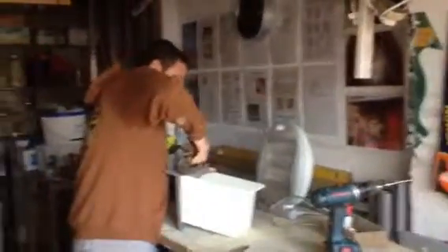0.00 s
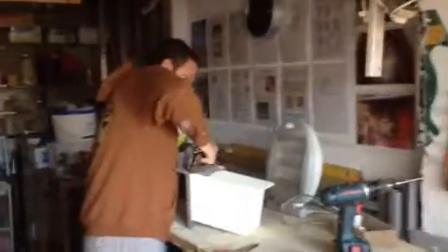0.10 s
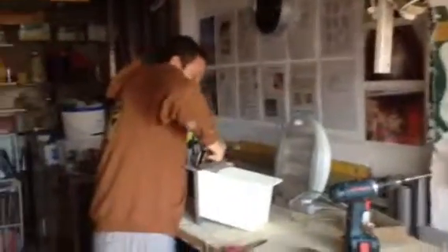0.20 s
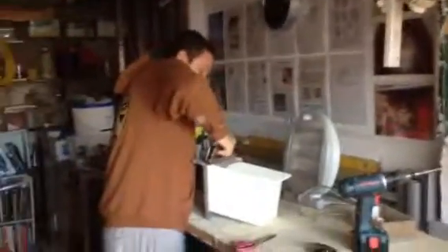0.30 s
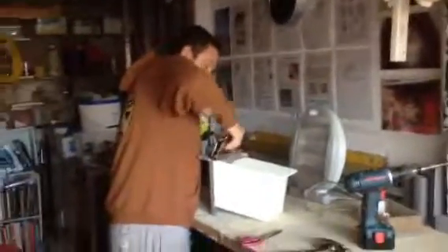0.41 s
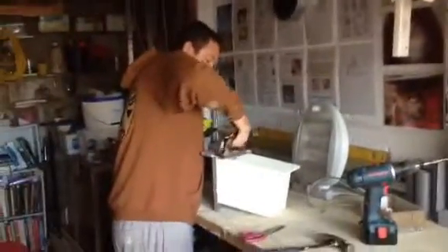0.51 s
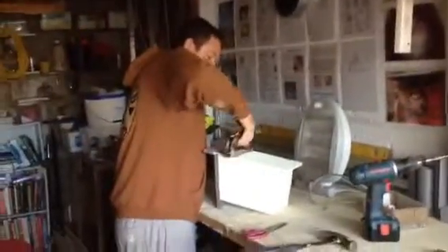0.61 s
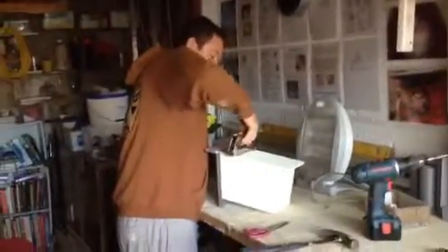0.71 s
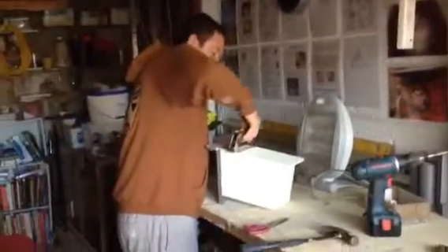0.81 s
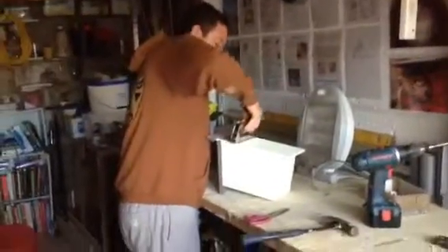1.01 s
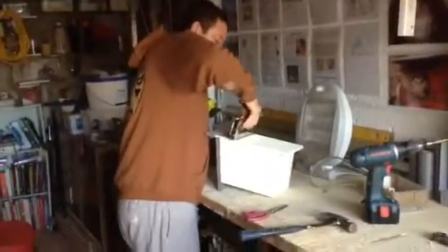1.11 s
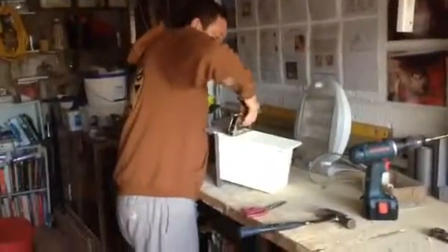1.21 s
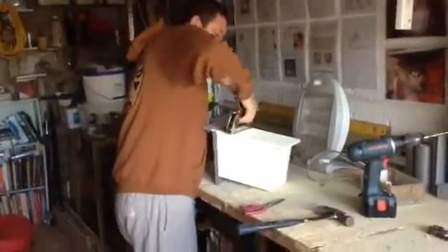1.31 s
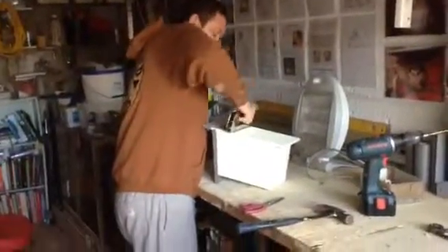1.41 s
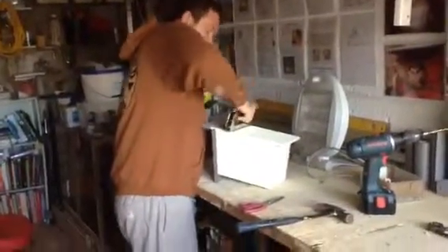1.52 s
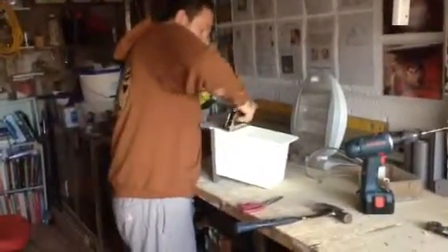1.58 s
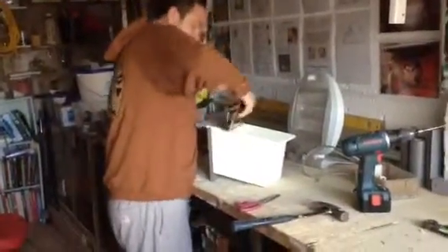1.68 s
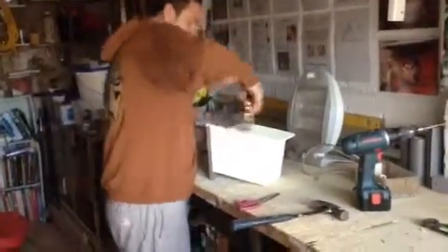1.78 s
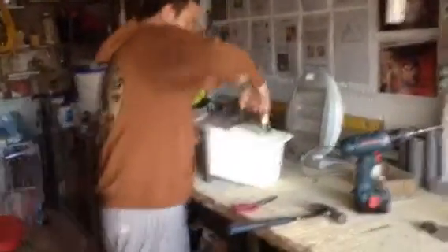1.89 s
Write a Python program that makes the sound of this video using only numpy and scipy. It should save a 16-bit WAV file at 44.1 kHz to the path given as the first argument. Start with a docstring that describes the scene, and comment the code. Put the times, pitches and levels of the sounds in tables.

```python
"""A small, cluttered workshop: a hand staple gun fires twice into a wooden box.
Each time the lever is squeezed and catches, the striker slams home and rings gun and box, the spring
sings on, and the lever clicks back. Between the shots the gun is set down on the box again.
Hits are coloured noise bursts with a short room tail; the ringing is decaying sine modes.
Soft hand rubs and quiet room tone sit underneath, and a faint hiss lingers after the first shot."""
import sys
import numpy as np
from scipy import signal
from scipy.fft import rfft, irfft
from scipy.io import wavfile
from scipy.ndimage import uniform_filter1d

SR = 44100
rng = np.random.default_rng(int(sys.argv[2]) if len(sys.argv) > 2 else 0)


def wrap_up_sound(samples):
    """Save the sound to the file named by the first command line argument, as 16-bit audio."""
    columns = np.atleast_2d(samples).T
    # keep every value between -1 and 1, then stretch to whole-number steps
    tamed = np.clip(columns, -1, 1)
    steps = np.round(tamed * 32767).astype(np.int16)
    wavfile.write(sys.argv[1], SR, steps)


N = 83790
T = np.arange(N) / SR
HZ = np.maximum(np.arange(N // 2 + 1) * SR / N, 1)

# the second row is a faint hiss lingering after the first shot; the others are hand and lever rubs
# (start [s], end [s], end level [dB], rise from start to end [dB])
RUB_AND_HISS_CUES = [(.02, .217, -60.5, 16.5), (.35, 0.426, -80, -19), (.54, 0.612, -59, 26),
                     (1.29, 1.463, -51, 29), (1.69, 1.749, -66.5, -2)]
# the lever catches under load (time [s], level [dB])
CATCH_CUES = [(0.1636, -52.5), (.1682, -38.5), (.176, -47), (.191, -47), (1.395, -57.5), (1.4304, -40.5),
              (1.4356, -37)]
# shots (time [s], slam level [dB], box boom [dB], steel rattle [dB], spring ring [dB])
SHOT_CUES = [(0.2202, -12.5, -26, -15, -63), (1.4807, -13.5, -14, -19, -52.5)]
# the lever springs back (time [s], level [dB])
CLICK_CUES = [(0.45, -55), (0.455, -43), (1.710, -66), (1.734, -51.5), (1.7408, -45), (1.8058, -47),
              (1.8283, -46)]
# the gun knocks on the box (time [s], level [dB], lever ring [dB])
KNOCK_CUES = [(0.61, -36.5, -67), (.906, -61, -89), (0.921, -66.5, -88.5)]

# modes of the gun pressed on the box (frequency [Hz], t60 [s], first shot [dB], second shot [dB])
BODY_MODES = [(325, 0.078, -31.5, -49.5), (536, 0.16, -46, -36), (672, 0.21, -44.5, -28),
              (866, 0.13, -16.5, -30), (1802, .17, -33, -33.5), (1855, .15, -22.5, -22),
              (1939, 0.25, -27.5, -30), (2196, 0.23, -31, -33), (3132, 0.18, -26, -37.5),
              (3280, .15, -32, -28.5), (3373, .14, -29, -30), (3704, 0.13, -21.5, -37.5),
              (4650, 0.17, -24.5, -41.5), (6904, .1, -37, -34.5), (7860, .09, -35, -33)]
# the spring's long ring (frequency [Hz], t60 [s], relative level [dB])
SPRING_MODES = [(1610, .7, -9), (1938, .7, -4.5), (2370, 1.1, -9.5), (2490, 1.1, -5.5), (3176, .5, -3.5),
                (3283, .6, -5.5), (3200, .8, 2.5), (3830, 0.67, -2.5), (3800, .7, -8), (4597, 0.64, 1)]

# noise colour of each layer (frequency [Hz], relative level [dB])
ROOM_TONE_EQ = [(25, -34.5), (60, -21), (100, -4.5), (140, 1), (250, -3), (450, -6.5), (1000, -9.5),
                (2000, -18), (4000, -22), (8000, -24.5), (15000, -30)]  # low, soft air
RUB_AND_HISS_EQ = [(80, -10), (200, -2.5), (900, -1), (1300, -7), (1950, -1), (2600, -10), (3900, -3),
                   (6000, -14), (8200, -10.5), (11000, -20.5), (15000, -27.5)]  # dry rustle
CATCH_EQ = [(50, -24.5), (130, -4), (220, 4), (400, -5), (870, 1.5), (1290, -9.5), (1700, 1.5), (2400, -10),
            (3600, -2), (6000, -14.5), (8000, -10.5), (15000, -23.5)]  # dull clunk
SLAM_EQ = [(60, -28), (140, -9.5), (250, -8.5), (330, -3), (460, -12), (850, -1), (1150, -3), (1600, -0.5),
           (2300, -3.5), (4600, 1), (6300, -8.5), (7700, 0), (9000, -9), (11200, -9.5), (13000, -16),
           (15000, -10.5)]  # full-range smack
CRACK_EQ = [(500, -23), (2500, -11), (4000, 2), (5200, 0.5), (6300, -6.5), (7600, -0.5), (9500, -7.5),
            (11500, -0.5), (15000, -8.5)]  # sharp top
BOOM_EQ = [(100, -26.5), (280, -28.5), (440, -18.5), (540, -2.5), (590, -9.5), (680, -0.5), (770, -9.5),
           (870, 3.5), (990, -1), (1130, -17.5), (1500, -3.5), (2000, -5.5), (2800, -26), (8000, -45)]  # hollow wood
STEEL_EQ = [(300, -23.5), (1200, -25.5), (1850, -1.5), (2200, -5.5), (2500, -1.5), (2850, -13), (3150, -2),
            (3700, 2), (4100, -13), (5200, -11.5), (9000, -26.5), (15000, -36.5)]  # metallic bite
CLICK_EQ = [(200, -33), (500, -43), (1000, -9), (1700, -4), (3200, -9), (3850, 3.5), (4500, -0.5),
            (5600, -8), (8000, -1), (10000, -12.5), (15000, -13)]  # thin and bright
KNOCK_EQ = [(40, -22), (100, -9.5), (190, 9), (320, -1), (430, -5), (650, -4), (860, -5), (1400, -17.5),
            (1700, -8), (2000, -14), (4300, -21.5), (8000, -37), (15000, -46)]  # low thud
TAP_EQ = [(100, -18), (600, -12), (920, 5), (1250, -16.5), (1750, -8), (2500, -37), (3700, -23.5),
          (5500, -36.5), (15000, -38.5)]  # woody mids

# the workshop's decay (frequency [Hz], t60 [s])
ROOM_DECAY = [(50, 0.3), (130, 0.243), (300, 0.1259), (800, 0.2126), (2000, 0.17), (5000, 0.1646),
              (9000, 0.15), (15000, 0.13)]
# strength of its reverb (frequency [Hz], gain [dB])
ROOM_EQ = [(60, -0.5), (130, 12.5), (260, 2.5), (500, 5), (1000, -0.5), (4000, 0), (12000, 1)]
# faint lingering ring of the clutter (frequency [Hz], relative level [dB])
CLUTTER_EQ = [(60, -43.5), (150, -36), (400, -35), (900, -41.5), (2000, -29.5), (4500, -38.5),
              (8000, -47.5), (15000, -56.5)]

LEVER_HZ, LEVER_T60_S = 3790, .7


def undb(db):
    """Decibels to gain."""
    return 10 ** (np.asarray(db) / 20)


def curve(points, hz):
    """Read a table on a log-frequency axis."""
    f, v = np.array(points).T
    return np.interp(np.log(hz), np.log(f), v)


def fade(t60, hold=0):
    """Hold, then die away by 60 dB in t60 seconds."""
    return np.exp(-np.log(1000) * np.maximum(T - hold, 0) / t60)


def attack(rise):
    """Fade in with a time constant of rise seconds."""
    return 1 - np.exp(-T / rise)


def at(start, x):
    """Delay a sound to its cue."""
    k = int(start * SR)
    return np.pad(x[:N - k], (k, 0))


def noise(colour):
    """Noise of a given colour, rms 1."""
    x = irfft(undb(curve(colour, HZ)) * np.exp(2j * np.pi * rng.random(len(HZ))), N)
    return x / x.std()


def ring(hz, t60):
    """One decaying mode."""
    return np.sin(2 * np.pi * (hz * T + rng.random())) * fade(t60)


def room_tail(colour, size=22050, clutter_t60=.95):
    """The workshop answers a hit: each octave dies at its own pace, the lows bloom late and stay."""
    spectrum = rfft(noise(colour)[:size])
    octave = np.log2(np.maximum(np.fft.rfftfreq(size, 1 / SR), 1))
    out = 0
    for hz in 32 * 2. ** np.arange(10):
        band = irfft(spectrum * np.maximum(1 - abs(octave - np.log2(hz)), 0))
        bloom = attack(.003 + 2.8 / hz)  # 3 ms plus 2.8 cycles
        decay = fade(curve(ROOM_DECAY, hz)) + undb(curve(CLUTTER_EQ, hz)) * fade(clutter_t60)
        out += undb(curve(ROOM_EQ, hz)) * band * (bloom * decay)[:size]
    return np.pad(out, (0, N - size))


def hit(colour, rise, hold, t60, room_db):
    """Parts chatter for a moment, their dense modes die quickly, the room follows; times in seconds."""
    return noise(colour) * attack(rise) * fade(t60, hold) + undb(room_db) * room_tail(colour)


def room_tone():
    """A quiet, steady bed of air."""
    return undb(-69.5) * noise(ROOM_TONE_EQ)


def rubs_and_hiss(rough_db=1.5, edge_s=.02):
    """Grainy noise ramps: hand and lever rubs, and the faint hiss that lingers after the first shot."""
    out = 0
    for start, end, db, rise_db in RUB_AND_HISS_CUES:
        grain = uniform_filter1d(rng.standard_normal(N), size=200)
        ramp_db = rise_db * np.clip((T - end) / (end - start), -1, 0)
        gate = np.clip((T - start) / edge_s, 0, 1) * np.clip(1 + (end - T) / edge_s, 0, 1)
        out += noise(RUB_AND_HISS_EQ) * undb(db + ramp_db + rough_db * grain / grain.std()) * gate
    return out


def lever_catches():
    """The loaded lever catches dully on the way down."""
    return sum(at(start, undb(db) * hit(CATCH_EQ, rise=.0004, hold=.0013, t60=.075, room_db=-14))
               for start, db in CATCH_CUES)


def shots():
    """The striker slips, cracks the staple off and slams home; steel rattles, box booms, spring sings."""
    out = 0
    for k, (start, db, boom_db, steel_db, spring_db) in enumerate(SHOT_CUES):
        slip = undb(db - 21.5) * noise(SLAM_EQ) * fade(.061)
        crack = undb(db + 2.5) * noise(CRACK_EQ) * fade(.009)
        slam = undb(db) * hit(SLAM_EQ, rise=.00017, hold=.0053, t60=.061, room_db=-4.5)
        boom = undb(boom_db) * hit(BOOM_EQ, rise=.001, hold=.0048, t60=.072, room_db=-12)
        steel = undb(steel_db) * hit(STEEL_EQ, rise=.0002, hold=.0048, t60=.04, room_db=-10.5)
        body = sum(undb(dbs[k]) * ring(hz, t60) for hz, t60, *dbs in BODY_MODES) * attack(.003)
        spring = sum(undb(spring_db + mode_db) * ring(hz, t60) for hz, t60, mode_db in SPRING_MODES)
        spring *= fade(.3, hold=.29)  # rings free, then is damped
        out += at(start - .0018, slip) + at(start, crack + slam + body + spring)
        out += at(start + .002, steel) + at(start + .003, boom)
    return out


def lever_clicks():
    """The lever springs back with bright, ringing clicks."""
    out = 0
    for start, db in CLICK_CUES:
        click = hit(CLICK_EQ, rise=.00016, hold=.0016, t60=.042, room_db=-7)
        ping = undb(-30.5) * ring(LEVER_HZ, LEVER_T60_S)
        out += at(start, undb(db) * (click + ping))
    return out


def gun_knocks():
    """The gun thuds on the box as it is set down and shifted; its lever rings faintly."""
    out = 0
    for start, db, ring_db in KNOCK_CUES:
        thud = undb(db) * hit(KNOCK_EQ, rise=.00033, hold=.007, t60=.1, room_db=-7)
        out += at(start, thud + undb(ring_db) * ring(LEVER_HZ, LEVER_T60_S))
    return out


def nose_tap(start=1.291, db=-52):
    """A light tap seats the nose for the second shot."""
    return at(start, undb(db) * hit(TAP_EQ, rise=.0012, hold=.00505, t60=.02496, room_db=-6.5))


def scene():
    """The mono mix: two shots up front, small handling sounds and room tone behind."""
    return (shots() + lever_catches() + lever_clicks() + nose_tap() + gun_knocks()
            + rubs_and_hiss() + room_tone())[None]


def record(dry, low_cut_hz=71, ceiling=.8, top_hz=15150):
    """Shed the deep bass, round off the loudest peaks and trim the top."""
    thin = signal.sosfilt(signal.butter(2, low_cut_hz, "high", fs=SR, output="sos"), dry)
    rounded = ceiling * np.tanh(thin / ceiling)
    return signal.sosfilt(signal.ellip(10, .2, 80, top_hz, fs=SR, output="sos"), rounded)


dry = scene()
out = record(dry)
wrap_up_sound(out)
```